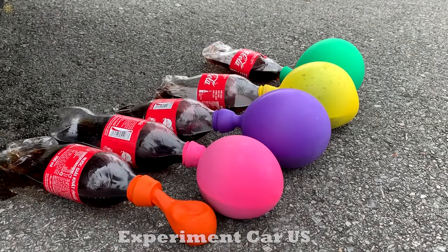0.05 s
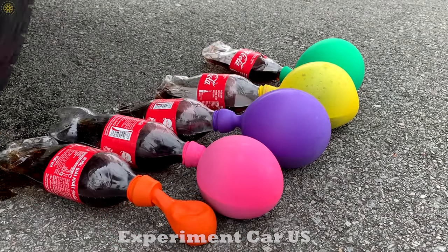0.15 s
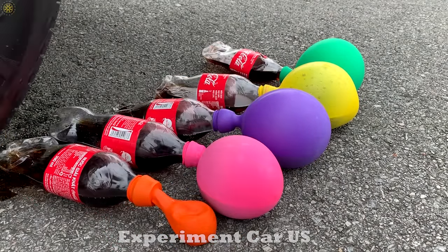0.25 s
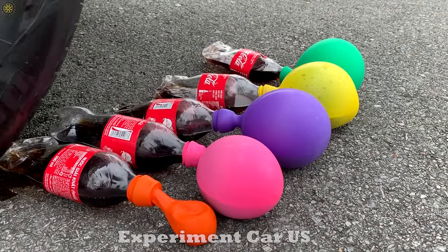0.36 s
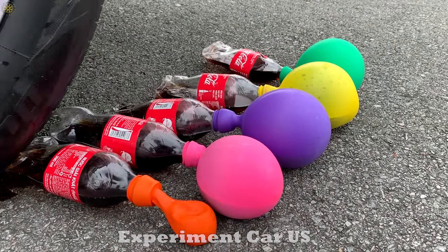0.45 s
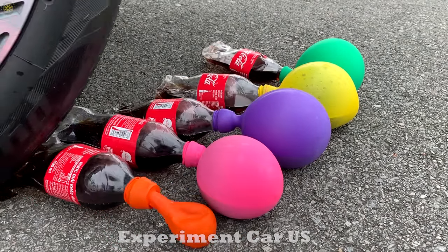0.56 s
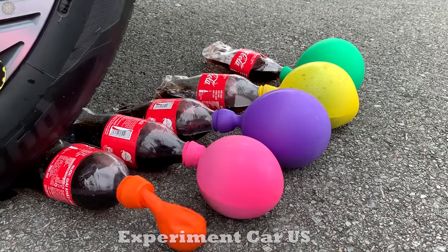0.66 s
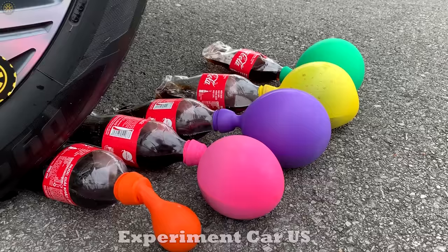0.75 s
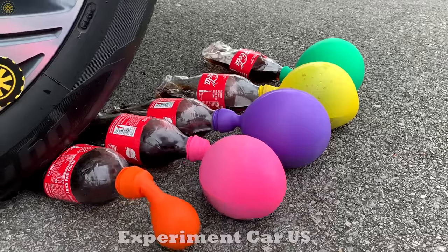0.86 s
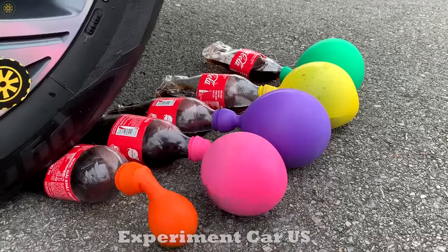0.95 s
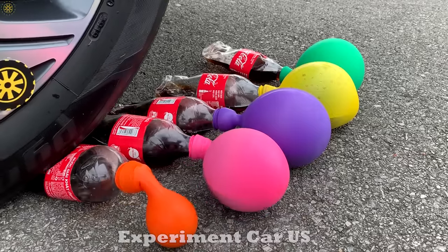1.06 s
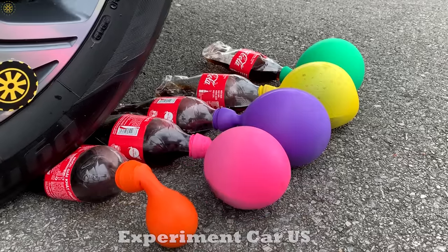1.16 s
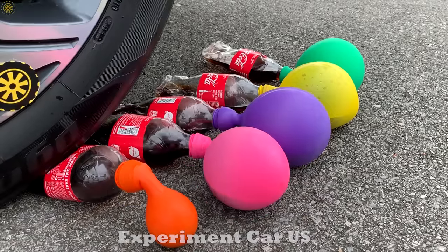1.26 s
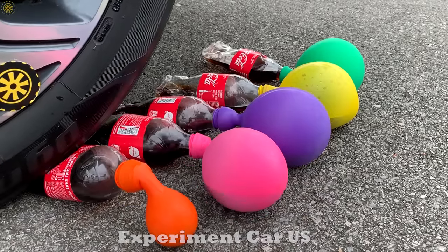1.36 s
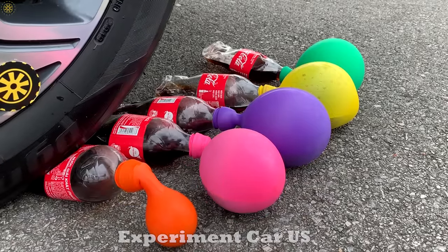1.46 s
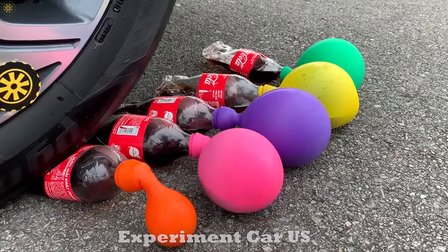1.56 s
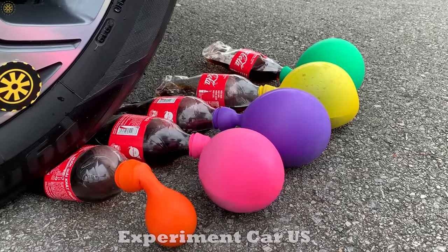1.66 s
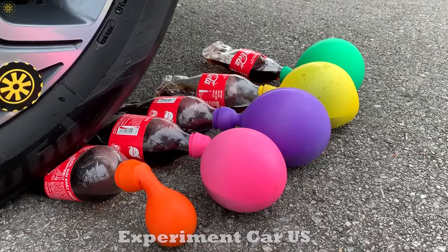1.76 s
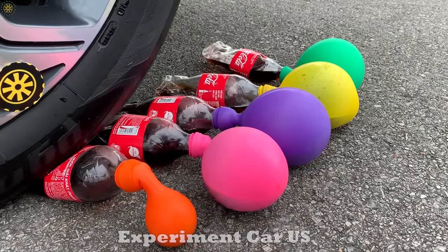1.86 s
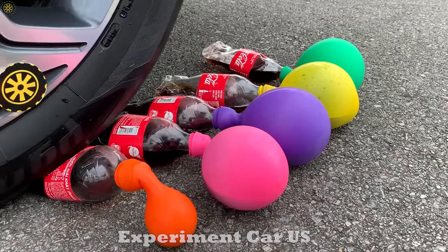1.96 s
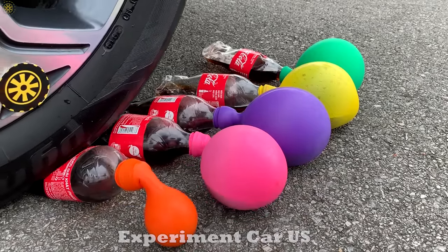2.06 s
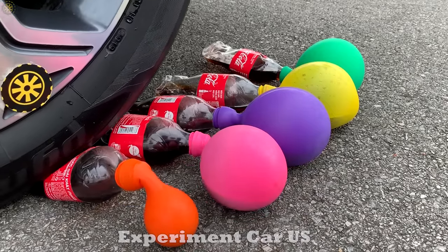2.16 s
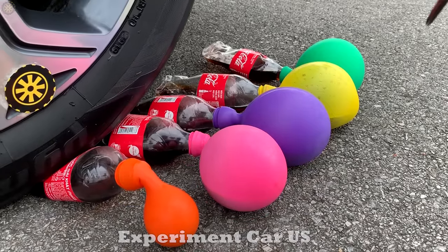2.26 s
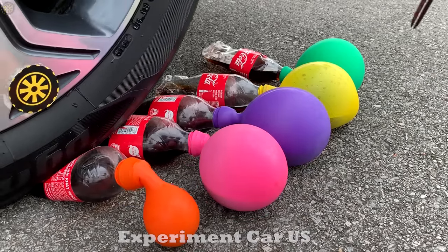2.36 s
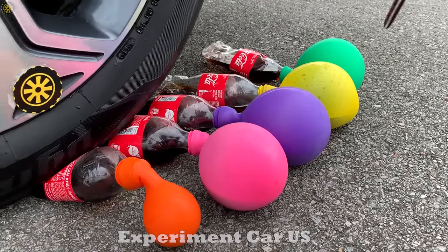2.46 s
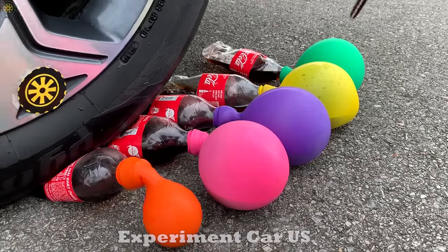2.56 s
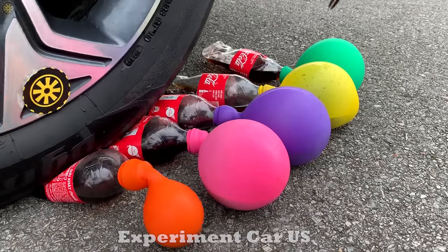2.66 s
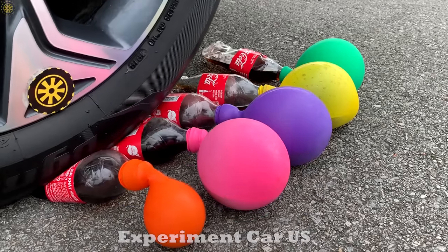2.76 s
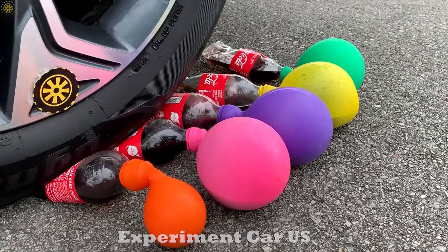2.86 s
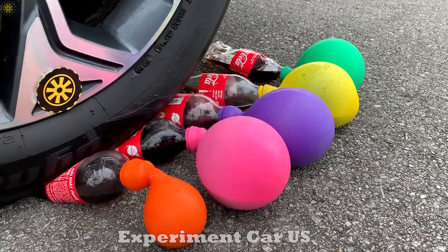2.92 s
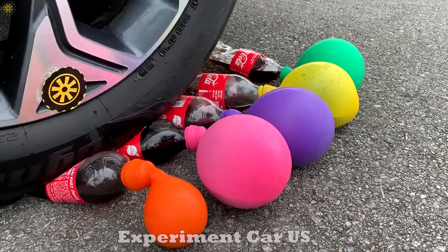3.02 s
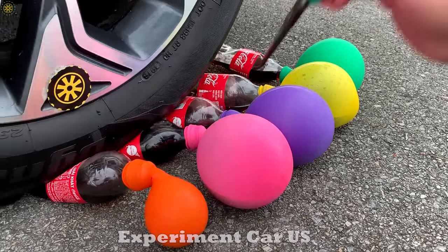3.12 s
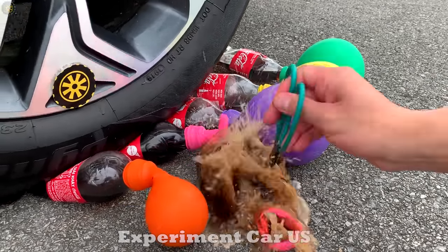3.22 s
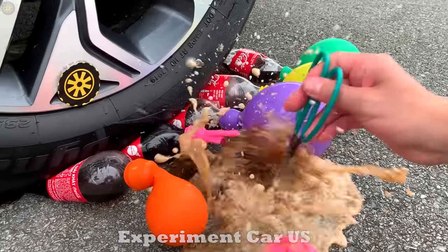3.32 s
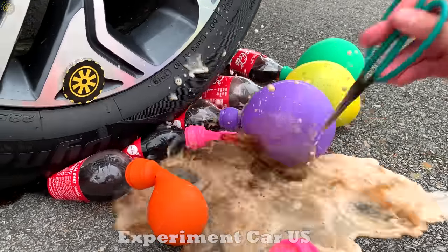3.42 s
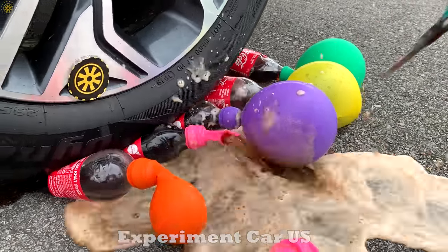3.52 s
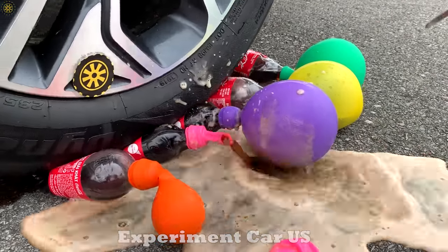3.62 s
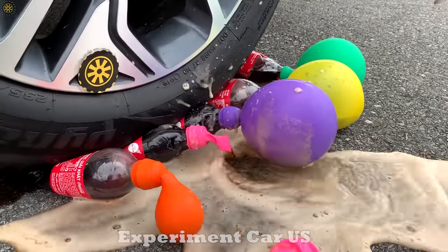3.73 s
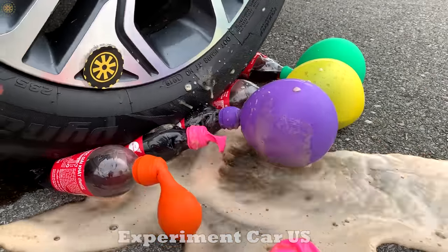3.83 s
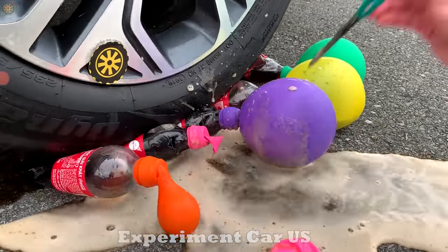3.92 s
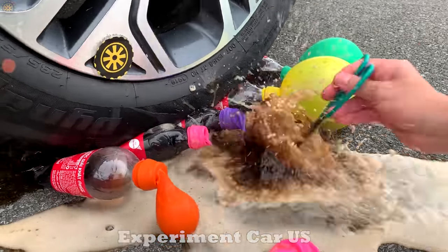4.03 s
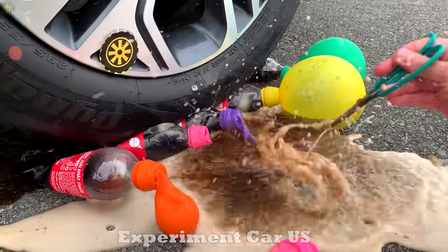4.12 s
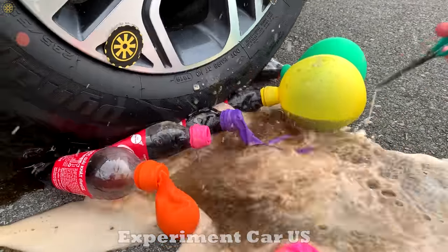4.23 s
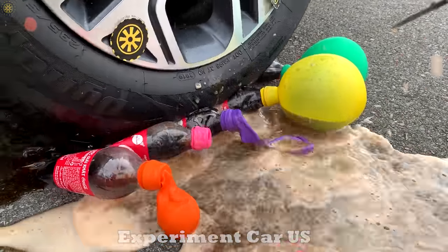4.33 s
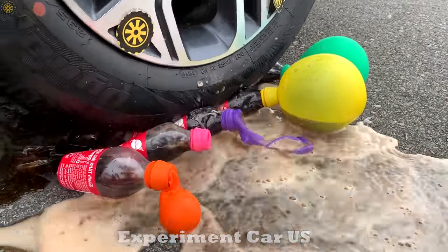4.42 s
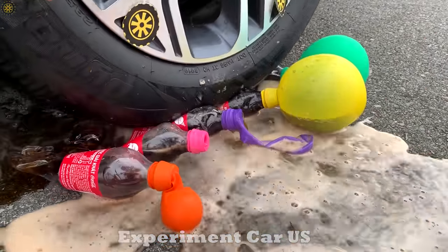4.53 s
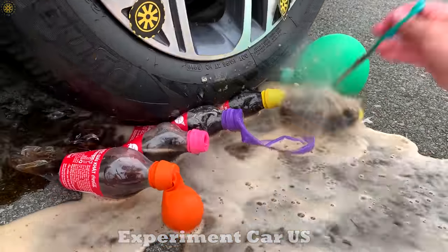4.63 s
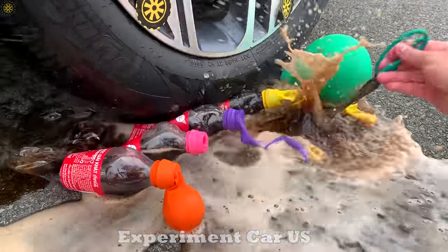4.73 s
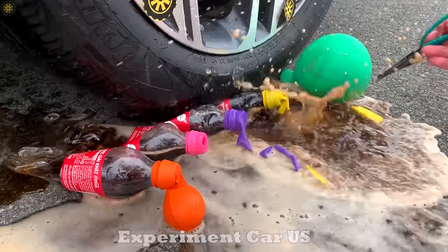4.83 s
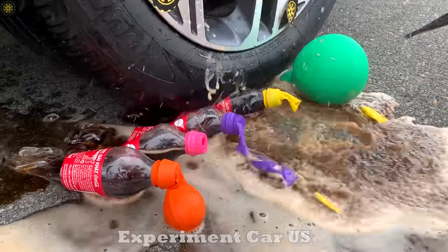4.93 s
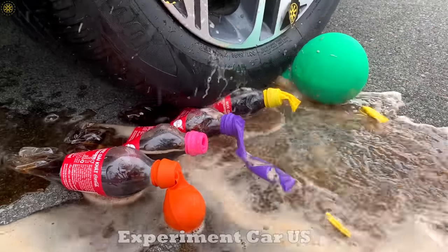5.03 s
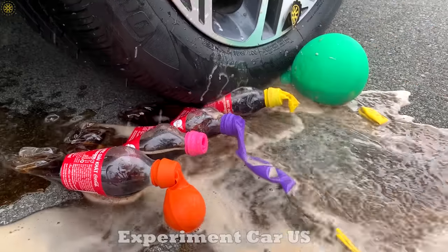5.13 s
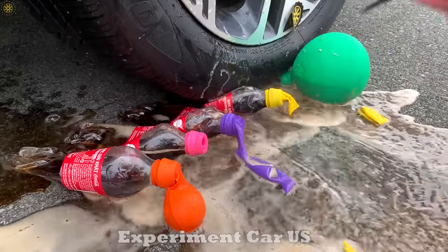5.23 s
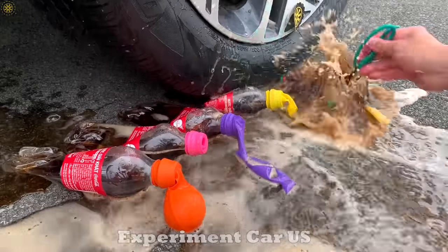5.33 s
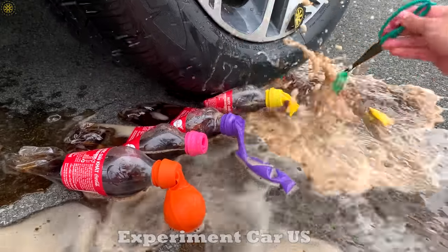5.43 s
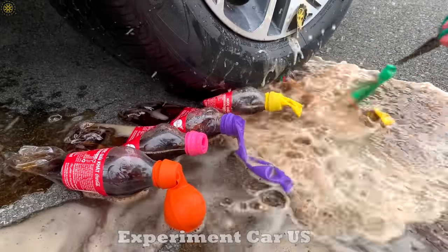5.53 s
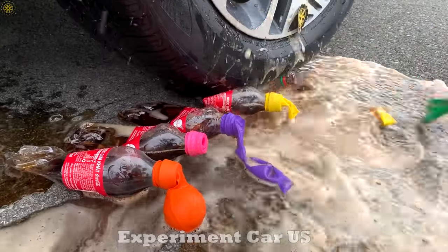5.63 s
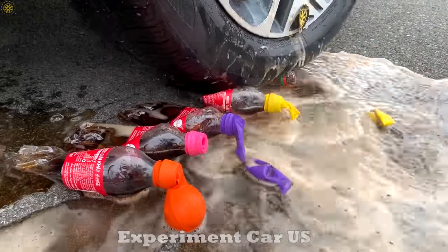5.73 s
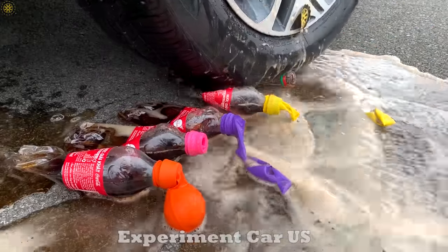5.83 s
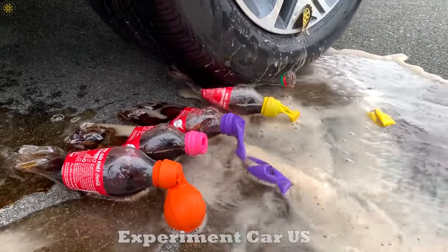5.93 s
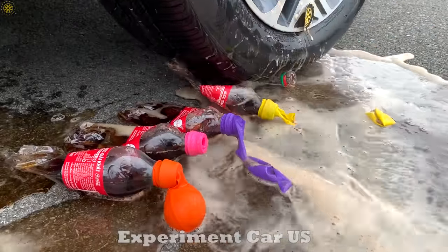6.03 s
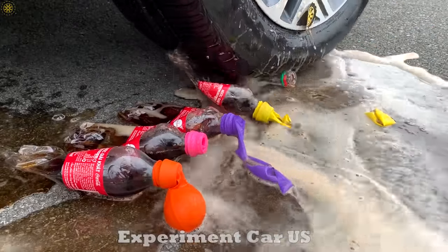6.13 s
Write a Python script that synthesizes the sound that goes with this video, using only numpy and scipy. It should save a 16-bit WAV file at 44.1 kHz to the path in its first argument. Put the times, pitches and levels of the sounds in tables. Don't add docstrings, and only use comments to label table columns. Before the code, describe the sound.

Outdoors on asphalt, a car idles faintly, then a little nearer, before an abrupt cut close to the tyre. Its low uneven rumble swells as plastic bottles buckle, boom and tick. Rubber creaks and gas squirts, then filled balloons burst with violent, wet pops. Soda sloshes and gulps while dense foam fizzes on. The close stereo microphone overloads at the bursts, and the background briefly drops after each one.

```python
import sys
import numpy as np
from scipy import signal
from scipy.fft import rfft, irfft, next_fast_len
from scipy.io import wavfile
from scipy.ndimage import map_coordinates

SR = 44100
rng = np.random.default_rng(int(sys.argv[2]) if len(sys.argv) > 2 else 0)


def int16_out(signal):
    q = np.round(np.clip(np.atleast_2d(signal).T, -1, 1) * 32767)
    wavfile.write(sys.argv[1], SR, q.astype(np.int16))


def gain_from_db(level_db):
    decades = np.asarray(level_db, float) / 20
    return 10 ** decades


N = 272538
SPILL_S = 3.28

# hz, density_db_per_hz
TEAR_SPECTRUM = [(150, -30), (600, -8), (1300, -5), (2100, 0), (3200, -8), (6300, -9), (9000, -10),
                 (14000, -13), (16000, -16), (18000, -30)]
# hz, density_db_per_hz
SNAP_SPECTRUM = [(1500, -30), (4000, -9), (6000, -5), (9000, 0), (14000, -2), (16000, -4), (18000, -30)]
# time_s, slosh_db
SODA_FLOW = [(3.28, -42.5), (3.5, -34), (3.56, -33.5), (3.66, -24.5), (3.71, -31), (3.9, -40.5),
             (4.3, -33.5), (4.44, -43), (4.7, -33.5), (4.8, -38), (5.6, -45), (6.18, -42.5)]


def unit(x):
    return x / np.sqrt(np.mean(x ** 2) + 1e-20)


def along(points, hz):
    point_hz, value = np.transpose(points)
    return np.interp(np.log(hz + 1), np.log(point_hz + 1), value)


def wobble(rate_hz):
    knots = rng.standard_normal(int(N * rate_hz / SR) + 4)
    return map_coordinates(knots, [np.arange(N) * rate_hz / SR])


def filtered(x, response):
    m = next_fast_len(N + 8192)
    return irfft(rfft(x, m) * response(np.fft.rfftfreq(m, 1 / SR)), m)[..., :N]


def noise(spectrum):
    return unit(filtered(rng.standard_normal(N), lambda hz: gain_from_db(along(spectrum, hz))))


def wide(spectrum, lag_samples, alike):
    shared = noise(spectrum)
    own = np.array([noise(spectrum), noise(spectrum)])
    common = np.array([shared, np.roll(shared, lag_samples)])
    return np.sqrt(alike) * common + np.sqrt(1 - alike) * own


def add(track, start_s, sound):
    part = track[round(start_s * SR):][:len(sound)]
    part += sound[:len(part)]


def place(pair, start_s, sound, lag, spread_db, t60):
    # time_s, left_lag_samples
    tyre_path = [
        (2.1, -7),
        (3.3, -6),
        (4, -2.5),
        (5.3, 0),
    ]
    split_hz = 3500
    t = np.arange(SR // 25) / SR
    tail = rng.standard_normal((2, len(t))) * gain_from_db(-60 * t / t60)
    tail = tail / np.linalg.norm(tail[0])
    heard = gain_from_db(spread_db) * signal.fftconvolve(sound[None], tail, axes=1)
    heard[:, :len(sound)] += sound
    low = signal.filtfilt(*signal.butter(2, 2 * split_hz / SR), heard[0])
    low_lag = np.interp(start_s, *np.transpose(tyre_path))
    add(pair[0], start_s + low_lag / SR, low)
    add(pair[0], start_s + lag / SR, heard[0] - low)
    add(pair[1], start_s, heard[1])


def shot_levels(now):
    change_s = [
        1.215,
        1.99,
    ]
    # engine_gain_db, clatter_db, hiss_db, foam_gain_db
    shots = [
        (-27.5, -59, -65, -12),
        (-17, -52, -61.5, -25),
        (-0.5, -29.5, -37, 0),
    ]
    return np.transpose(shots)[:, np.searchsorted(change_s, now)]


def ducking(now):
    duck_s = [2.095, 2.122, 2.94, 3.295, 3.685, 4.075, 4.748, 5.385]
    duck_db = [8, 17.8, 11.2, 18.5, 11, 17.6, 10, 9.9]
    drop_s, hold_s, recover_db_per_s = .012, .025, 85
    losses = []
    for s, db in zip(duck_s, duck_db):
        held_s = s + hold_s
        times = [s - drop_s, s, held_s, held_s + db / recover_db_per_s]
        losses.append(np.interp(now, times, [0, db, db, 0]))
    return np.max(losses, axis=0)


def engine_and_slosh(now, loss_db):
    # hz, density_db_per_hz
    rumble_spectrum = [(15, -33), (25, -40), (41, -5), (66, -1), (129, -9.5), (167, -9), (226, -20),
                       (268, -18.5), (409, -40), (450, -28), (580, -65), (990, -120)]
    # hz, density_db_per_hz
    clatter_spectrum = [(200, -8), (330, -4), (460, -4.5), (550, 2.5), (650, -7.5), (1200, -6.5),
                        (1650, -11), (2100, -7.5), (2500, -12.5), (3200, -11), (4500, -33)]
    # hz, density_db_per_hz
    slosh_spectrum = [(200, -32), (300, -4), (470, 3.5), (1000, -2), (1800, -3), (2650, -4), (3300, -13.5),
                      (4500, -65)]
    # time_s, rumble_db
    effort_curve = [(0, -26.5), (1.99, -26.5), (2.15, -19), (2.44, -19.5), (2.54, -23.5), (2.93, -19.5),
                    (3.21, -25), (3.27, -17), (3.31, -33.5), (3.66, -21.5), (4.03, -27.5), (4.09, -29),
                    (4.31, -29), (4.45, -31), (4.7, -27), (4.8, -31), (5.25, -34), (6.18, -33)]
    idle_db, clatter_follows = -22, 0.13
    rumble_duck, clatter_duck = 0.74, 0.57

    gain_db, clatter_idle_db, _, _ = shot_levels(now)
    effort_db = np.interp(now, *np.transpose(effort_curve))
    flow_db = np.interp(now, *np.transpose(SODA_FLOW))
    dry = now < SPILL_S
    rumble_db = effort_db + gain_db - rumble_duck * loss_db
    clatter_db = clatter_idle_db + clatter_follows * (effort_db - idle_db)
    middle_db = np.where(dry, clatter_db, flow_db) - clatter_duck * loss_db

    throb = wobble(35)
    rumble = wide(rumble_spectrum, lag_samples=22, alike=1.0)
    rumble = unit(gain_from_db(1.94 * throb + 0.54 * wobble(7.6)) * rumble)
    clatter = wide(clatter_spectrum, lag_samples=19, alike=0.71)
    slosh = wide(slosh_spectrum, lag_samples=19, alike=0.32)
    middle = unit(gain_from_db(1.2 * throb + .6 * wobble(12)) * np.where(dry, clatter, slosh))
    return gain_from_db(rumble_db + 3.5) * rumble + gain_from_db(middle_db + 2.0) * middle


def foam_and_spray(now, loss_db):
    # hz, density_db_per_hz
    fizz_spectrum = [(6000, -9), (7500, -8), (9500, -3), (11000, -6.5), (12200, -5.5), (13700, -7.5),
                     (15700, -5.5), (17000, -37)]
    # hz, density_db_per_hz
    spray_spectrum = [(2500, -20), (3300, -3.5), (4500, -2), (5500, -2.5), (6800, -1.5), (8000, -8)]
    # time_s, fizz_db
    foam_curve = [(0, -53), (.2, -53), (.24, -47), (.45, -48.5), (1.03, -52), (1.99, -55), (2.1, -63),
                  (2.3, -36.5), (2.53, -40.5), (2.76, -47), (2.91, -39), (3.1, -37), (4.05, -33.5),
                  (4.3, -34.5), (4.7, -33.5), (5.2, -34.5), (5.33, -36), (6.18, -35)]
    # peak_s, fizz_db, spray_db, slope_db_per_s
    jets = [
        (3.214, -23, -23.5, 380),
        (3.552, -28.5, -31.5, 173),
    ]
    calm_db, spray_wet_db, spray_follows = -37, -42.5, 0.74
    fizz_duck = 1.02

    _, _, hiss_db, foam_gain_db = shot_levels(now)
    flow_db = np.interp(now, *np.transpose(SODA_FLOW))
    foam_db = np.interp(now, *np.transpose(foam_curve))
    wet_db = spray_wet_db + spray_follows * (flow_db - calm_db)
    spray_gain = gain_from_db(np.where(now < SPILL_S, hiss_db, wet_db) - loss_db)
    fizz_gain = gain_from_db(foam_db + foam_gain_db - fizz_duck * loss_db)
    for peak_s, jet_fizz_db, jet_spray_db, slope in jets:
        fall_db = slope * abs(now - peak_s)
        spray_gain = np.hypot(spray_gain, gain_from_db(jet_spray_db - fall_db))
        fizz_gain = np.hypot(fizz_gain, gain_from_db(jet_fizz_db - fall_db))

    spray = wide(spray_spectrum, lag_samples=19, alike=0.1)
    spray = unit(gain_from_db(1.7 * wobble(590) + 1.3 * wobble(32)) * spray)
    fizz = wide(fizz_spectrum, lag_samples=-10, alike=0.6)
    fizz = unit(gain_from_db(1.36 * wobble(790) + 0.6 * wobble(15)) * fizz)
    return gain_from_db(2.0) * spray_gain * spray + gain_from_db(4.5) * fizz_gain * fizz


def snap(ring_hz, t60, hiss, t):
    ring = .7 * np.sin(2 * np.pi * ring_hz * t)
    return gain_from_db(-60 * t / t60) * (1 - np.exp(-t / .0002)) * (hiss + ring)


def ticks():
    # time_s, peak_db, ring_hz
    tick_events = [(2.0758, -21, 8600), (2.0803, -6, 5500), (2.2824, 2.5, 9100), (2.395, 4.5, 4100),
                   (2.4977, -20, 9300), (2.5373, -14, 8560), (2.5855, -16, 6500), (2.6814, -19, 4030),
                   (2.7111, 4, 4470), (2.743, -6.5, 13500), (2.75, -14, 13800), (2.781, -15, 4260),
                   (2.81, -1.5, 13700), (2.833, -9, 13100), (2.902, -3, 6140), (3.004, -20, 4700),
                   (3.027, -14, 8800), (3.0594, -16.5, 9310), (3.0939, -15.5, 8330), (3.3638, -38, 9040),
                   (3.7103, -20, 4930), (3.7777, -18, 8900), (3.989, -13, 4360), (4.2749, -1.5, 4030),
                   (4.3833, -13.5, 7580), (4.5035, -13, 8500), (4.5554, -18, 13400), (4.9278, -33, 8100)]
    out, t = np.zeros((2, N)), np.arange(SR // 30) / SR
    hiss = noise(SNAP_SPECTRUM)
    for s, db, ring_hz in tick_events:
        crack = hiss[round(s * SR) - len(t):][:len(t)]
        click = gain_from_db(db + 2.5) * snap(ring_hz, .0051, crack, t)
        place(out, s, click, lag=10, spread_db=-6, t60=.012)
    return out


def dents():
    # time_s, peak_db, ring_hz, crack_db
    buckles = [(2.107, -2, 2480, -30), (2.398, -2.5, 2440, -20), (2.183, -21, 1100, -32),
               (2.282, -6.5, 625, -16), (2.396, 4.5, 231, -35), (2.552, -21.5, 847, -18),
               (2.588, -27, 1070, 14), (2.645, -12, 250, -11), (2.661, -28, 342, -15),
               (2.676, -19, 263, -13), (2.71, 1.5, 414, -1.5), (2.874, -19.5, 320, -1),
               (2.903, -14, 223, -30), (3.017, -15, 580, 0.5), (3.105, 0.5, 273, -36),
               (3.188, -4, 880, -11), (3.241, -17, 398, -8), (3.359, -31, 294, 2), (3.564, -17.5, 604, -15),
               (3.713, -22.5, 275, -3.5), (3.779, -11.5, 261, -27), (3.912, -13.5, 334.5, -36),
               (3.977, -17, 333, -25), (3.996, -15.5, 410, -20), (4.221, -18.5, 597, -8),
               (4.276, -6, 1424, -2.5), (4.33, -6, 670, -20), (4.416, -19, 810, -7), (4.9, -15, 774.5, -29)]
    # time_s, peak_db, ring_hz
    later_knocks = [(4.137, -34.5, 663), (4.201, -32.5, 817), (4.268, -21, 580), (4.497, -21, 579),
                    (4.56, -24, 670), (4.604, -19.5, 700), (4.635, -24, 446), (4.686, -23.5, 330),
                    (4.804, -21, 790), (4.949, -29, 670), (5.109, -22.5, 700), (5.153, -19, 1390),
                    (5.174, -20, 563), (5.201, -23, 436), (5.231, -26, 393), (5.279, -32.5, 400),
                    (5.326, -22.5, 500), (5.571, -34.5, 1510), (5.675, -33, 460), (5.941, -18.5, 1700),
                    (5.995, -31.5, 930), (6.1, -36.5, 690), (6.158, -17, 2140)]
    # hz, density_db_per_hz
    panel_spectrum = [(150, 0), (300, 4.5), (700, 8.5), (1200, 0.5), (2100, -2), (3000, -3.5), (5000, -18),
                      (9000, -25)]
    later_crack_db = -26
    ring_s, ref_hz, shorter = 0.045, 500, 0.55
    hard_db, choke = -10.5, 0.34

    out, t = np.zeros((2, N)), np.arange(SR // 10) / SR
    rattle, grit = noise(panel_spectrum), noise(TEAR_SPECTRUM)
    sag = 2 * np.pi * 0.485 * np.log(1 + t / 0.00067)
    for s, db, hz, crack_db in buckles + [(*row, later_crack_db) for row in later_knocks]:
        t60 = ring_s * (ref_hz / hz) ** shorter * gain_from_db(-choke * max(db - hard_db, 0))
        before = slice(round(s * SR) - len(t), round(s * SR))
        ring = gain_from_db(-60 * t / t60) * np.sin(2 * np.pi * 0.834 * hz * t + sag)
        boom = gain_from_db(0.83 * db - 12 - 60 * t / 0.12) * np.sin(2 * np.pi * 215 * t + sag)
        panels = gain_from_db(-4.5 - 60 * t / (1.254 * t60)) * rattle[before]
        crack = gain_from_db(crack_db - 3.5 - 60 * t / (0.63 * t60)) * grit[before]
        sound = (1 - np.exp(-t / .0005)) * (ring + boom + panels + crack)
        place(out, s, gain_from_db(db + 4.0) * sound, lag=9.1, spread_db=-4.5, t60=0.044)
    return out


def bursts():
    # hz, density_db_per_hz
    strain_spectrum = [(150, -20), (400, -2), (1200, -3), (2100, 0), (3500, -9), (6500, -9), (9000, -20),
                       (16000, -32)]
    # time_s, level_db, cycles_per_e_fold_of_time, life_s
    blasts = [(2.1075, -3, 2.2, .011), (2.9245, -4, 2.2, .009), (3.659, -8, 2.6, .008),
              (3.276, 3, 1.08, .014), (4.04, 9, 1.08, .011), (4.7085, 4, 1.08, .0145),
              (5.3468, 7, 1.4, .0065)]
    # time_s, lead_in_db, rip_db, rip_s, brightness_0_to_1
    rips = [(2.1077, -6, -2, 0.0052, 0.05), (2.889, -32, -8.5, 0.0054, 0.73),
            (2.924, -2.5, 10.5, 0.00073, 0.92), (3.274, -1.5, 1.5, 0.0045, .4),
            (3.659, -10, 1.5, 0.0033, 0.41), (4.0379, -2, 0, 0.0062, 0.23), (4.0637, -31, -19, 0.0029, 0.9),
            (4.707, -9.5, 1, 0.0031, 0.12), (4.7358, -35, -7.5, 0.003, 0.71),
            (5.344, -13, 2.5, 0.0058, 0.56), (5.365, -15, -17, 0.005, 0.22)]
    lead_s, settle_db, settle_t60_s = 0.0049, -11, 0.062

    out, t = np.zeros((2, N)), np.arange(SR // 16) / SR
    strain, grit, hiss = noise(strain_spectrum), noise(TEAR_SPECTRUM), noise(SNAP_SPECTRUM)
    for s, db, cycles, life_s in blasts:
        phase = 2 * np.pi * cycles * np.log(1 + t / .0009)
        swing = -gain_from_db(db) * np.exp(-(t / life_s) ** 2) * np.sin(phase)
        place(out, s, swing, lag=-6, spread_db=-11, t60=.02)
    for s, lead_db, rip_db, rip_s, bright in rips:
        here = slice(round(s * SR), round(s * SR) + len(t))
        texture = bright * hiss[here] + (1 - bright) * grit[here]
        rip = gain_from_db(rip_db - 60 * np.maximum(t - rip_s, 0) / .009) * texture
        swell = gain_from_db(lead_db) * np.exp(-t[::-1] / lead_s) * strain[here]
        flap_gain = (1 - bright) * gain_from_db(rip_db + settle_db - 60 * t / settle_t60_s)
        flap = flap_gain * strain[here][::-1]
        place(out, s + rip_s, flap, lag=9, spread_db=-3, t60=.03)
        place(out, s, rip, lag=9, spread_db=-7, t60=.016)
        place(out, s - len(t) / SR, swell, lag=9, spread_db=-6, t60=.025)
    return out


def gurgles():
    # start_s, end_s, level_db, middle_hz
    gulp_runs = [(2.549, 2.705, -16, 1220), (2.721, 2.9, -22.5, 506), (3.496, 3.662, -16.5, 725),
                 (3.899, 4.027, -15.5, 601), (4.278, 4.697, -21, 698), (4.802, 4.966, -22, 850),
                 (5.104, 5.262, -28.5, 616)]
    out, t = np.zeros((2, N)), np.arange(SR // 30) / SR
    for start_s, end_s, db, middle_hz in gulp_runs:
        span_s = end_s - start_s
        for pitch, slide, when, level in rng.standard_normal((round(130 * span_s), 4)):
            hz = middle_hz * np.exp(.5 * pitch)
            envelope = hz * t * np.exp(-hz * t / 1.1)
            gulp = np.sin(2 * np.pi * hz * t * (1 + 12 * slide * t)) * envelope
            s = start_s + span_s * (.5 + np.arctan(1.5 * when) / np.pi)
            place(out, s, gain_from_db(db + 4 * level) * gulp, lag=5, spread_db=-4, t60=.035)
    return out


def creaks():
    # start_s, end_s, first_rate_hz, level_db, ring_hz
    drags = [(3.1685, 3.19, 112, -7, 5600), (3.1935, 3.258, 150, -12, 5600), (3.33, 3.43, 120, -34, 9000),
             (3.518, 3.54, 400, -21, 4100), (3.542, 3.585, 115, -12, 4700), (3.594, 3.604, 200, -11, 4700),
             (3.614, 3.63, 200, -13, 4600), (2.866, 2.884, 300, -26, 8600), (2.585, 2.63, 200, -23, 2000)]
    quicken_hz_per_s, dry_hz, dry_crack, wet_crack = 800, 5000, .95, .3
    out, t = np.zeros((2, N)), np.arange(SR // 30) / SR
    scrape = 0.73 * noise(SNAP_SPECTRUM) + .5 * noise(TEAR_SPECTRUM)
    for start_s, end_s, first_hz, db, ring_hz in drags:
        s = start_s
        crack = dry_crack if ring_hz > dry_hz else wet_crack
        for level, timing, pitch in rng.standard_normal((30, 3)):
            if s >= end_s:
                break
            rub = crack * scrape[round(s * SR):][:len(t)]
            slip = snap(ring_hz * (1 + .03 * pitch), .012, rub, t)
            place(out, s, gain_from_db(db + 1.6 * level) * slip, lag=10, spread_db=-4, t60=.009)
            s += (1 + .05 * timing) / (first_hz + quicken_hz_per_s * (s - start_s))
    return out


def scene():
    now = np.arange(N) / SR
    loss_db = ducking(now)
    steady = engine_and_slosh(now, loss_db) + foam_and_spray(now, loss_db)
    return steady + ticks() + dents() + bursts() + gurgles() + creaks()


def band_limit(x):
    return signal.sosfilt(signal.butter(12, 15870, fs=SR, output="sos"), x)


def record(dry):
    # centre_hz, width_hz, depth_db
    notches = [
        (11550, 400, -42),
        (7100, 300, -6),
    ]

    def dips(hz):
        return gain_from_db(sum(db * np.exp(-((hz - centre) / width) ** 4) for centre, width, db in notches))

    x = filtered(dry, dips) * gain_from_db([[-.4], [.4]])
    x = x / (1 + abs(x / .99) ** 12) ** (1 / 12)
    return band_limit(x)


dry = scene()
out = record(dry)
int16_out(out)
```